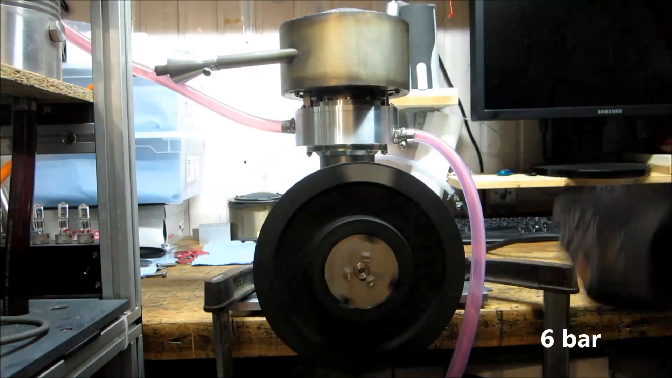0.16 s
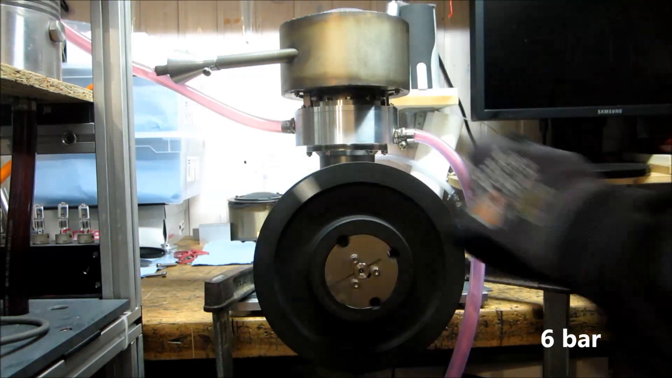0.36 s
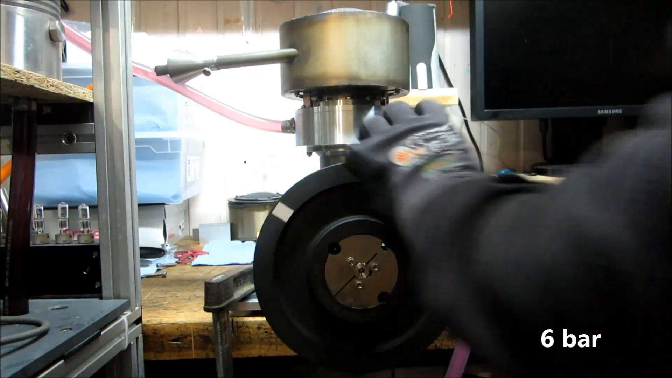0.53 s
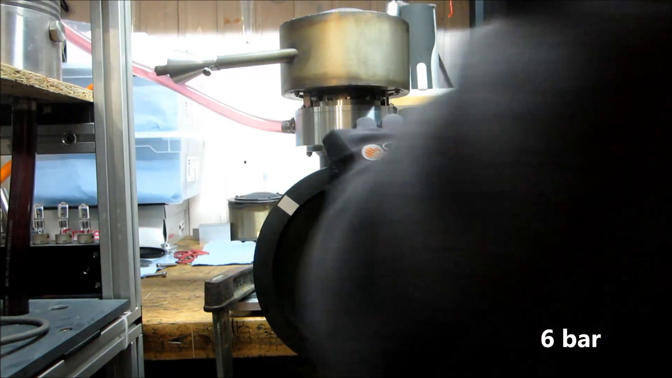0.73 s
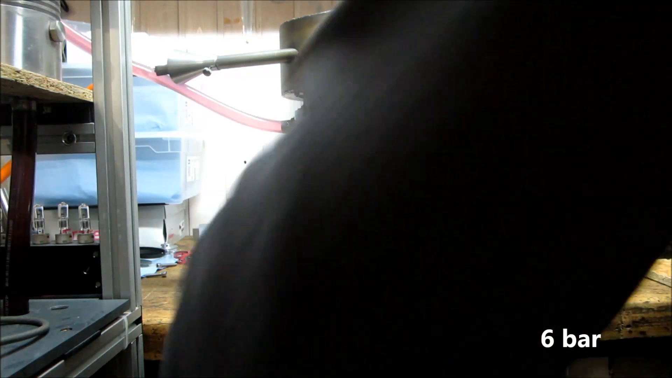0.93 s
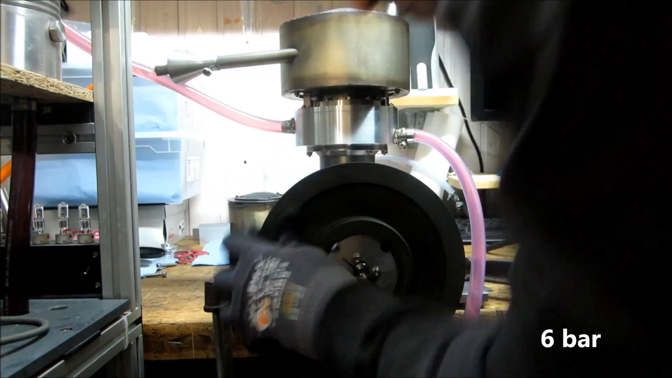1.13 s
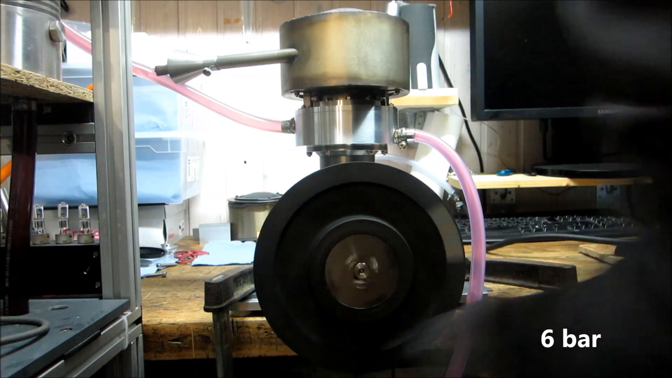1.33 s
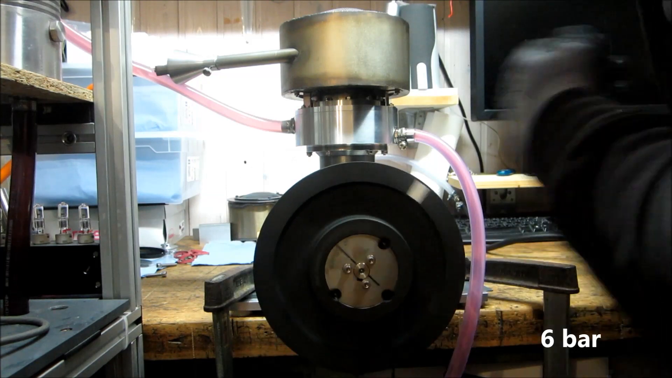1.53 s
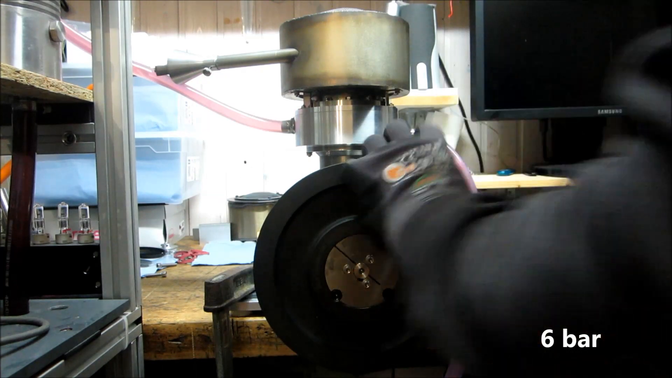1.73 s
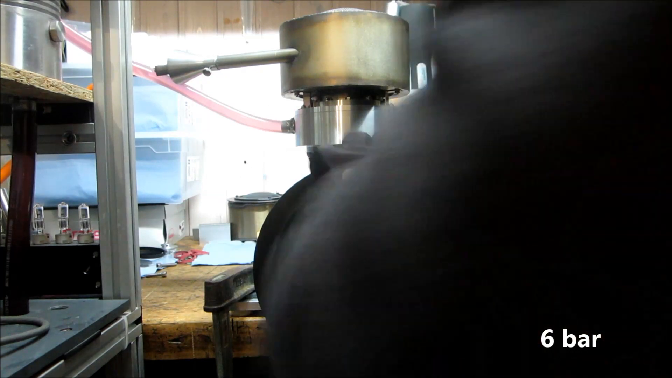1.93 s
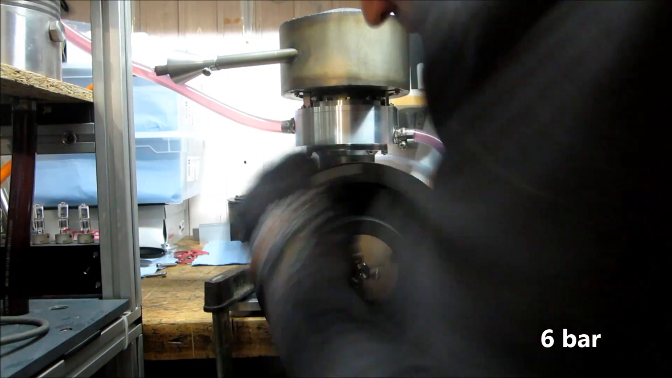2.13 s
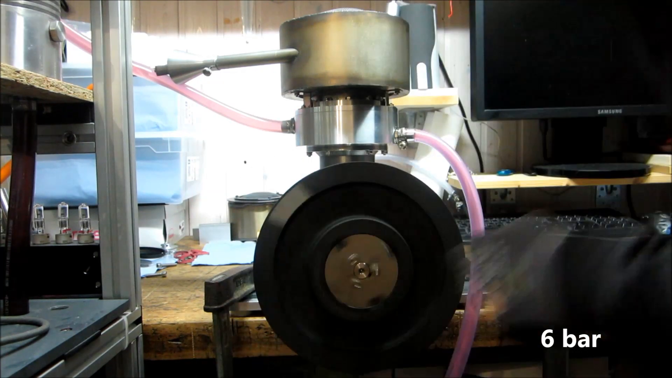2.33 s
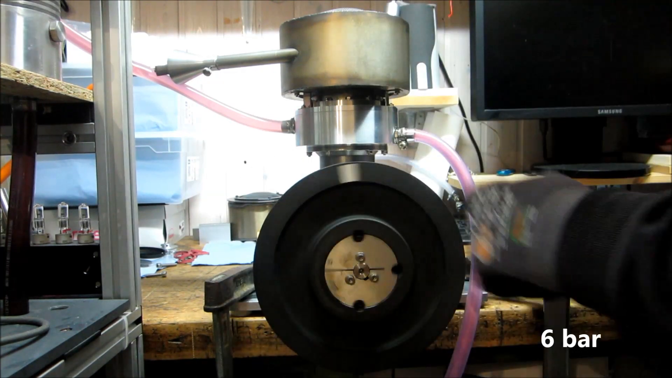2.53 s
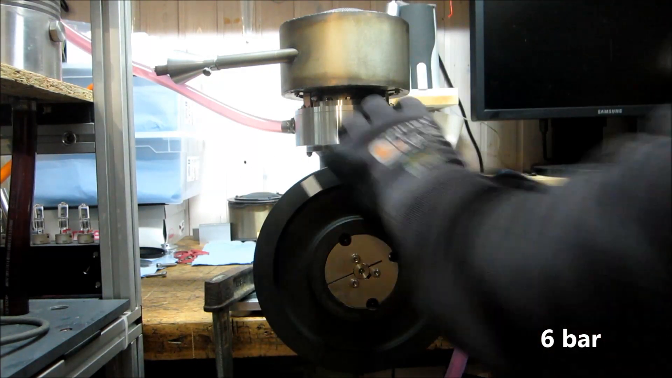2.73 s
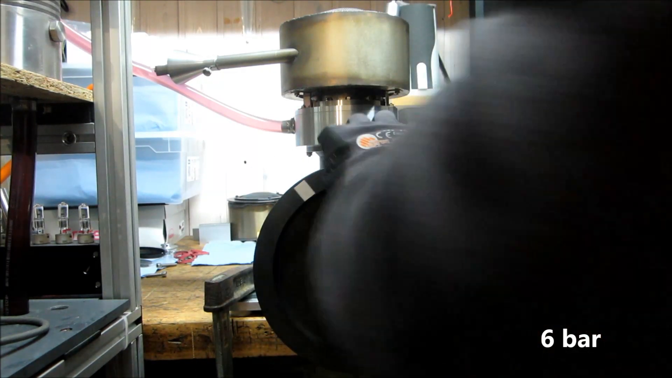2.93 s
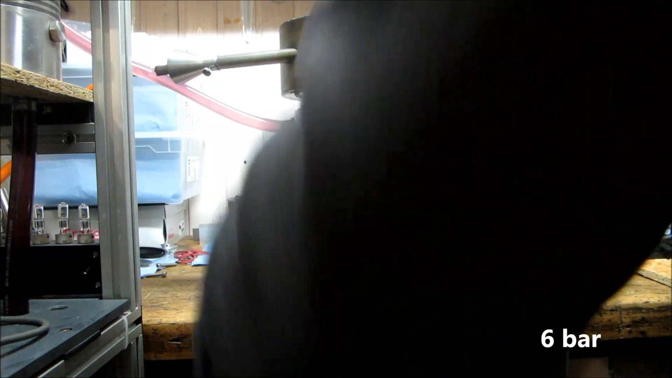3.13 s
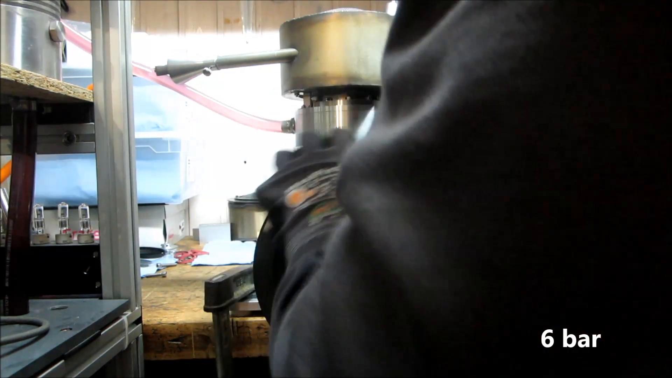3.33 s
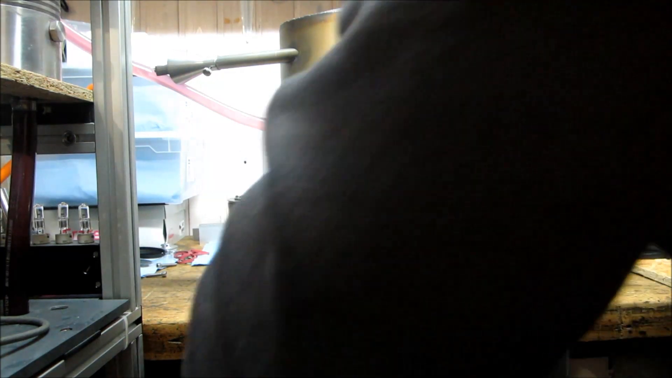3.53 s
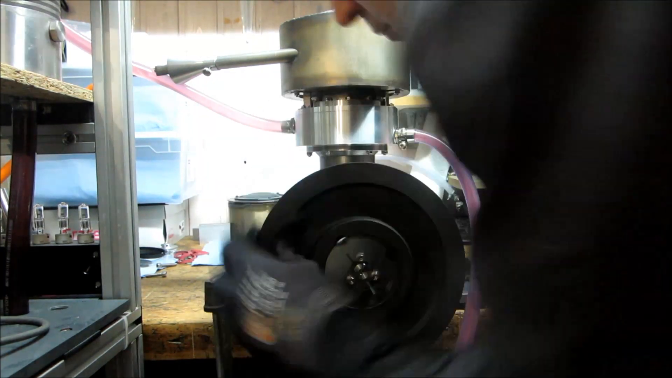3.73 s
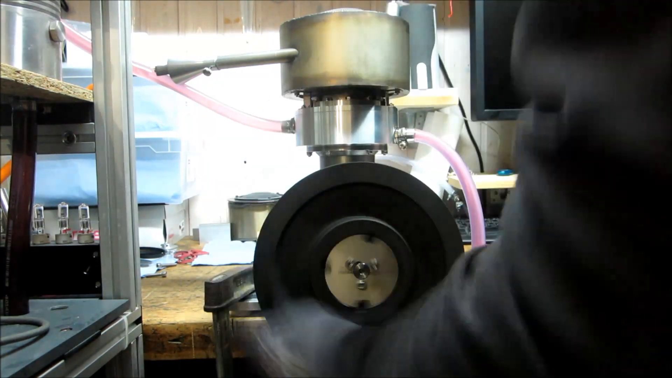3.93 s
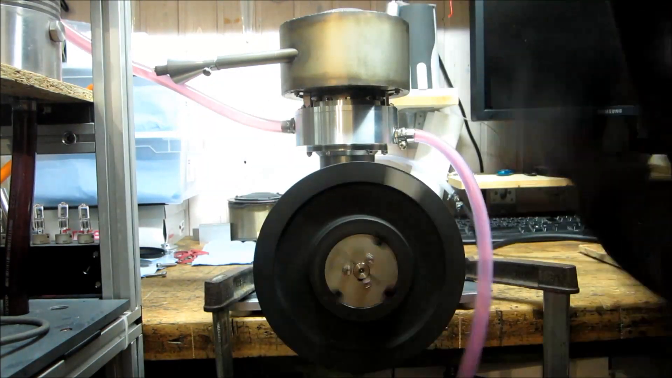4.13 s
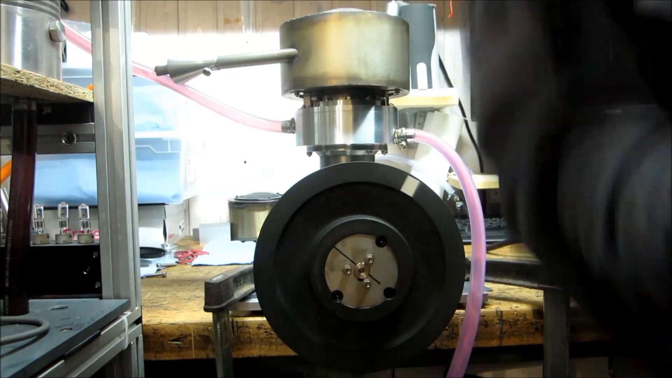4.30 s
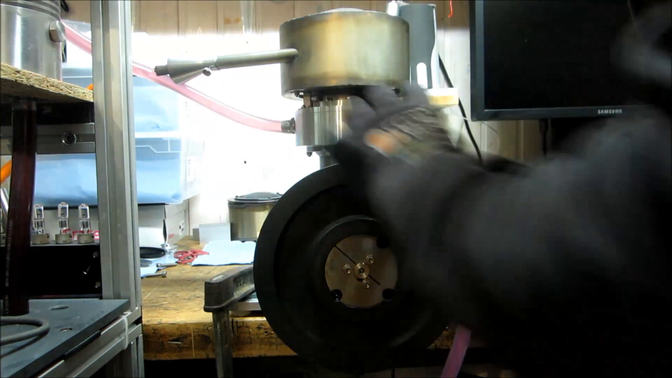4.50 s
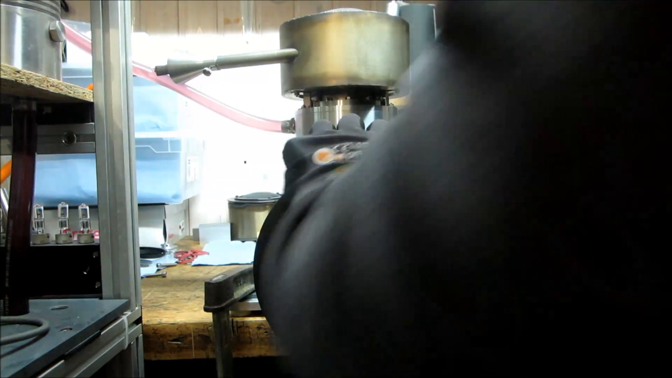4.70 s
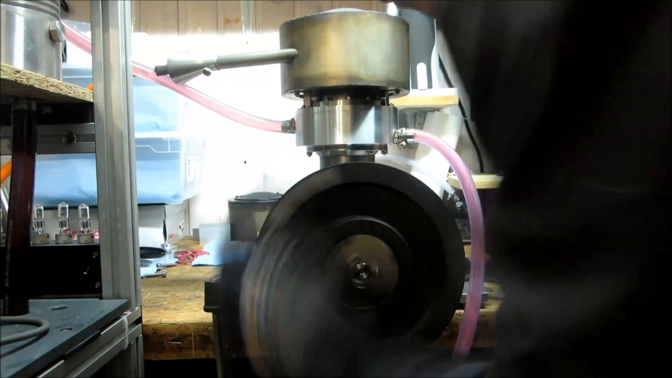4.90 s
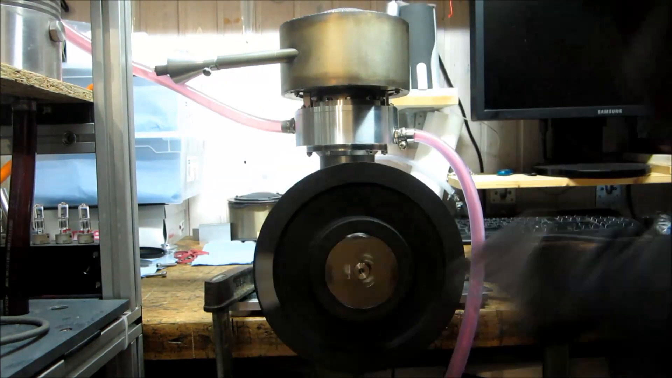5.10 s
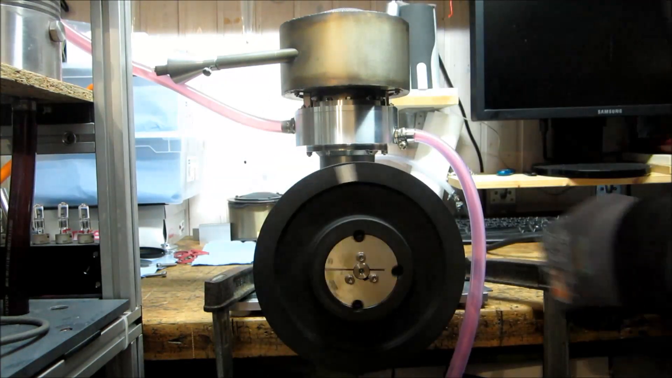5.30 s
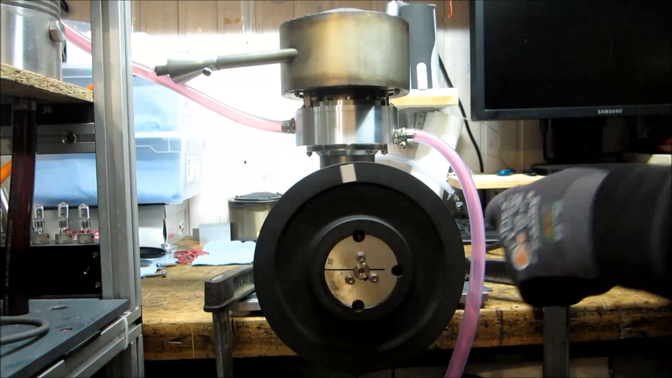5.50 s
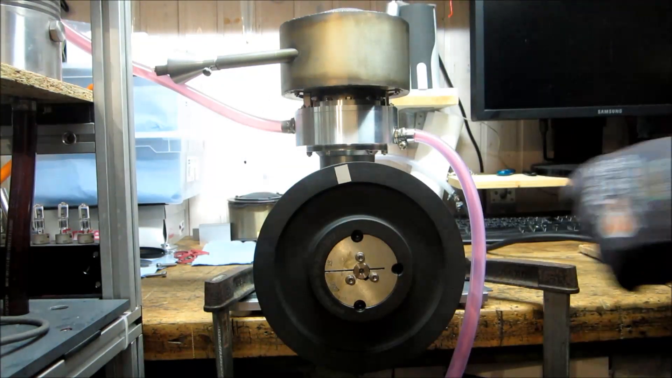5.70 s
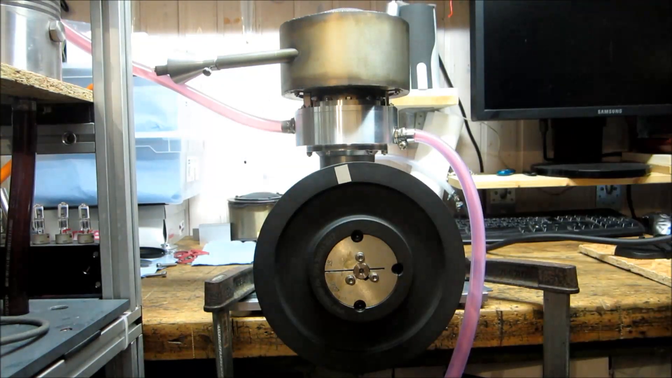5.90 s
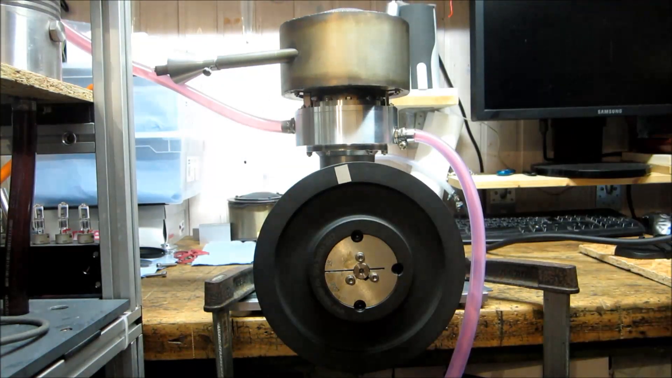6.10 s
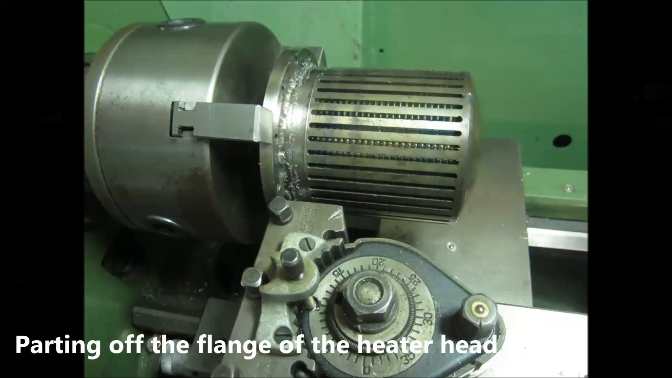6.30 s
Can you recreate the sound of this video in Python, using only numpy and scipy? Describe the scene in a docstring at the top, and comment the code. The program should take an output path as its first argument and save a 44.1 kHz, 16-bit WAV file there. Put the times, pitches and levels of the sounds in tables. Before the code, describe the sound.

Loose crank parts knock and rattle as a flywheel is swung by hand on a bench: doubled clacks, bouncing knocks, small bright clicks, brief dry scrapes. A dull boom from the bench sits under every heavy blow, and fabric swishes between them. The engine does not fire. The blows end shortly after five seconds, leaving soft hiss and low hum that cut off suddenly. Near, mono sound in a small hard room.

```python
"""Hand-swung flywheel on a bench

A gloved hand swings the flywheel of a small engine clamped to a workshop bench; it does not start.
Loose drive parts collide: bursts of impacts excite crankcase resonances and steel modes, and the bench booms.
Filtered noise gives the rub of glove and sleeve, random slips the scraping, gliding sines faint whistles.
Short, diffuse echoes of a small shop surround the blows, over low rumble, hiss and steady tones."""
import sys
import numpy as np
from scipy import signal
from scipy.fft import rfft, irfft, next_fast_len
from scipy.io import wavfile
from scipy.ndimage import uniform_filter1d

SR = 44100
rng = np.random.default_rng(int(sys.argv[2]) if len(sys.argv) > 2 else 0)


def bounce(signal):
    """Save signal as a 16-bit WAV file at the path given by the first command-line argument."""
    frames = np.transpose(np.atleast_2d(signal))
    limited = np.clip(frames, -1, 1)
    pcm = np.round(limited * 32767).astype(np.int16)
    wavfile.write(sys.argv[1], SR, pcm)


N = 280015

# Table levels are relative: each source may add its own gain.
# Kinds of blow: contact time [t/s], bench thump, bench boom, clack, tick, tick brightness,
# hollow case ring [level/dB each], case note, bench note [f/Hz each], bench sway [level/dB],
# delay until the bench takes the load [t/s]
BLOW_KINDS = {"forward": (.003, -1.5, -5, -2, -6.5, -2, -4, 1850, 545, -22, .0027),
              "over the top": (.0026, -8, -8.5, -1, -12, -5, -6, 1450, 555, -24, .0024),
              "touch down": (.006, -8, -5, -.5, -7.5, 0, -7, 1220, 345, -18, .003),
              "landing": (.0032, -5, -1, 1, -6, -7, -4, 1480, 320, -18, .005),
              "back": (.0027, -1.5, -10, .5, -7.5, 0, -2, 1215, 520, -27, .0026),
              "rebound": (.0028, 1, -3.5, -4, -2, -12, -7, 1850, 500, -14, .011),
              "hollow rebound": (.0025, 0, -5, 0, -1.5, -16, -3, 1195, 535, -15, .011),
              "clack": (.002, -9, -9.5, 1.5, -9, -7, -8, 1220, 480, -20, .0029),
              "rattle": (.004, -3, 0, -1, -9.5, 1, -4, 1200, 450, -14, .0035),
              "thud": (.005, -6, 0, -10, -22, -8, -4, 860, 400, -12, .002),
              "tap": (.003, -9, -5, -1, -20, -4, -3, 1200, 450, -20, .003),
              "tick": (.003, -14, -10, -6, 0, 0, -12, 1500, 380, -25, .0025)}
# Forward pulls: knock [t/s], knock, clack [level/dB each], delay to landing [t/s], landing in steel,
# landing in bench, bench sway [level/dB each], notes of knock, clack and landing [f/Hz each]
FORWARD_PULLS = [(.018, -40, -31.5, .118, -41, -38.5, -62, 1850, 1440, 1450),
                 (2.209, -36.5, -29, .121, -41, -41.5, -59, 1840, 1850, 1840),
                 (4.986, -36, -30, .146, -42, -39.5, -50, 1915, 2200, 1450)]
# Pulls the other way: knock [t/s], [level/dB]
BACK_PULLS = [(1.398, -35), (4.103, -34)]
# The wheel rocks back after a forward pull: [t/s], steel, bench, bench sway [level/dB each]
REBOUNDS = [(.296, -45.5, -43, -60), (2.546, -47, -46, -56)]
# The slack drive falls against its other side: [t/s], steel, bench, bench sway [level/dB each],
# added hollow ring of the case [level/dB], case note [f/Hz]
CLACKS = [(.195, -46, -50, -60, 5, 1840), (.207, -36.5, -39, -48, 3, 1160),
          (1.084, -35.5, -39, -63, 5, 1240), (2.433, -47, -45, -62, 7, 950),
          (2.447, -43, -41.5, -56, 4, 940), (3.757, -35.5, -39.5, -64, 6, 1210)]
# The linkage rattles under handling: [t/s], steel, bench [level/dB each], case note [f/Hz]
RATTLES = [(.002, -48, -49, 1850), (.107, -46, -48, 1100), (1.15, -52, -57, 850), (1.208, -57, -62, 1400),
           (1.26, -55, -60, 1065), (1.321, -56, -58, 2045), (2.096, -55, -54, 1625),
           (2.118, -57, -58, 1030), (2.164, -57, -62, 1920), (2.19, -49, -52, 1910),
           (3.393, -65, -63, 1500), (3.664, -63, -55, 1475), (3.696, -50, -55, 1030),
           (3.887, -56, -60, 1940), (4.938, -55, -63, 1500), (4.967, -48, -54, 1500)]
# Light hollow taps on the case: [t/s], steel, bench [level/dB each], case note [f/Hz]
TAPS = [(1.098, -41, -46, 1420), (2.619, -58, -54, 880), (3.94, -59, -56, 820), (4.76, -64, -67, 1750),
        (4.885, -63.5, -66, 900), (4.927, -55, -64, 1000), (5.346, -53.5, -61, 1210),
        (5.43, -62, -63, 1100)]
# Dull thuds as the engine settles on the bench: [t/s], [level/dB], bench note [f/Hz]
THUDS = [(.178, -48.5, 380), (2.403, -47, 425), (2.497, -53, 380), (3.412, -58, 550), (5.192, -48, 385)]
# Small sharp contacts: [t/s], [level/dB], contact time [t/s], brightness [level/dB]
TICKS = [(.079, -48.5, .002, 11), (.142, -47, .002, 9), (.195, -42.5, .002, -17), (.435, -54, .003, -30),
         (.869, -60, .0008, 10), (1.025, -59, .0023, -5), (1.153, -60, .0015, 5), (1.209, -61, .0015, 4),
         (1.262, -60, .0015, 4), (1.328, -48, .002, 0), (1.346, -49, .001, 6), (1.585, -52, .002, -12),
         (2.287, -50, .0016, 7), (2.297, -47, .0014, 8), (2.433, -44.5, .001, -16), (2.988, -62, .0015, 2),
         (3.027, -65, .004, -9), (3.174, -61, .002, -25), (3.646, -60, .0047, -9), (3.7, -57, .002, 8),
         (3.812, -58, .002, 8), (3.843, -55, .002, 10), (3.912, -59, .002, 8), (4.1345, -32, .00025, 4),
         (4.831, -64, .0034, -12), (5.077, -48, .0044, 8)]
# Resonances of the crankcase: [f/Hz], width [f/Hz], over the clack's spectrum [level/dB]
CASE_RESONANCES = [(728, 70, 0), (835, 60, 2), (1004, 60, 3), (1205, 70, 6), (1368, 45, 4), (1490, 45, 6),
                   (1698, 50, 5), (1825, 50, 8), (1897, 45, 6), (2056, 50, 1), (2378, 80, 7), (2718, 60, 4)]
# Modes of the flywheel's steel: [f/Hz], [level/dB], 60 dB decay time [t/s]
STEEL_MODES = [(3451, -1, .55), (3810, 3, .15), (4080, -4, .3), (4533, 2.5, .6), (4790, -5, .4),
               (5230, 1, .25), (5620, -6, .4), (6072, -2, .55), (6686, -5, .5), (6918, -3, .55),
               (7450, -7, .45), (7900, -6, .6), (8780, -1, .3), (9400, -7, .45), (10045, -7, .5),
               (10700, -9, .45), (11499, -8, .55), (12060, -9, .45), (13480, -13, .5), (15030, -19, .45)]
# Modes of the bench top: [f/Hz], [level/dB], 60 dB decay time [t/s]
BENCH_MODES = [(69.5, -32, 1.9), (75, -24, .8), (86, -21, .5), (103, -17.5, .55), (118, -16.5, 0.5),
               (147, -12, 0.13), (177, 3.5, 0.13), (194, 3, 0.13), (199.5, -23.5, 1.4), (243, -16, 0.33),
               (262, -8.5, 0.19), (285, -7.5, 0.2), (323, -12.5, 0.25), (346, -6, 0.19), (378, -14.5, .8),
               (422, -1, 0.23), (441.7, -24, 0.9), (460, -2.5, 0.11), (519, .5, 0.13), (551.8, .5, 0.11),
               (603.6, -7.5, 0.07), (690, -10, 0.12), (735, -9, .12)]
# Spectrum of the clack: [f/Hz], density [level/dB]
CLACK_SPECTRUM = [(250, -22), (550, -5), (800, -3), (1200, .5), (1600, -1.5), (2000, -2), (2500, -3.5),
                  (3100, -7), (5000, -22), (16000, -45)]
# Spectrum of the tick: [f/Hz], density [level/dB]
TICK_SPECTRUM = [(1200, -27), (2600, -6.5), (3200, 0.5), (3850, 5), (4600, -1), (6000, -5), (8800, -7),
                 (12000, -12.5), (15500, -28.5)]
# Dry parts scrape as the wheel creeps round: peak [t/s], [level/dB], rise, fall [t/s each]
SCRAPES = [(1.2, -61, .07, .09), (1.392, -49, .02, .008), (3.825, -56, .03, .03), (3.91, -61, .02, .04),
           (4.035, -64, .015, .03), (4.098, -48, .022, .008)]
# Spectrum of the scraping: [f/Hz], density [level/dB]
SCRAPE_SPECTRUM = [(200, -14), (600, -2), (1000, 0), (2000, -4), (3000, -10), (5000, -18), (14000, -32)]
# Glove rub at a forward pull: delay from knock to peak [t/s], [level/dB], rise, fall [t/s each],
# share of fine fizz [0-1]
FORWARD_RUB = (.05, -50, .036, .084, .24)
# Glove rub at a pull the other way: the same columns
BACK_RUB = (-.004, -50.6, .027, .095, .25)
# Sleeve brushes: centre [t/s], [level/dB], half length [t/s], share of fine fizz [0-1],
# low edge, high edge [f/Hz each]
SWISHES = [(.07, -54, .03, .4, 100, 15500), (.34, -64, .08, .6, 100, 15500),
           (.68, -70, .11, .38, 400, 14000), (1.12, -64.5, .12, .28, 100, 15000),
           (1.338, -53, .014, .24, 200, 15000), (2.6, -71, .09, .7, 100, 15500),
           (3.81, -63, .12, .45, 200, 15000), (4.04, -66, .03, .2, 600, 15000),
           (4.73, -74.5, .11, .25, 200, 15000), (5.665, -62.5, .06, .85, 1500, 9000),
           (5.89, -73, .025, .76, 1200, 9000), (6.068, -66, .028, .99, 5500, 15000)]
# Spectrum of the coarse rub: [f/Hz], density [level/dB]
CLOTH_SPECTRUM = [(200, -1), (600, -0.5), (1300, 0), (3000, -1), (5000, -8), (9000, -46.5), (15000, -27.5)]
# Spectrum of the fine fizz: [f/Hz], density [level/dB]
FIZZ_SPECTRUM = [(1500, -14), (4000, -4), (6500, -3), (9000, -4), (12000, -7.5), (15500, -16)]
# Thin gliding whistles: start [t/s], length [t/s], start, middle, end [f/Hz each], [level/dB]
WHISTLES = [(1.6, .2, 14900, 14100, 13400, -91), (1.6, .08, 12100, 11400, 10900, -91),
            (1.68, .05, 11000, 11900, 12300, -91), (3.19, .11, 11000, 11900, 12000, -89),
            (3.29, .09, 12100, 11800, 12000, -89), (3.24, .15, 15150, 14900, 14800, -94),
            (3.37, .13, 11000, 11950, 11600, -91), (3.4, .13, 10300, 10600, 9700, -93),
            (3.49, .09, 12000, 11600, 10900, -90), (4.55, .11, 14300, 15300, 14500, -93),
            (4.6, .08, 11000, 11700, 12000, -91), (4.74, .12, 12000, 11150, 12200, -89),
            (4.78, .08, 13000, 13600, 13900, -91), (5.22, .15, 14650, 14400, 13700, -93),
            (5.3, .07, 15200, 15000, 14200, -93)]
# Reverberation of the shop: [f/Hz], 60 dB decay time [t/s]
ROOM_DECAY = [(80, 0.71), (200, 0.49), (420, 0.72), (800, 0.43), (2000, 0.22), (5000, 0.13), (10000, 0.1),
              (16000, 0.66)]
# Spectrum of the rumble and hiss: [f/Hz], density [level/dB]
AIR_SPECTRUM = [(15, -42.5), (25, -2.5), (80, -0.5), (144, -5), (204, -2), (254, -4.5), (554, -11.5),
                (687, -10.5), (807, -8.5), (899, -12.5), (1150, -14), (2370, -18), (2640, -17.5),
                (11600, -26), (15600, -31.5)]
# Faint steady tones: [f/Hz], rms [level/dB]
HUM_TONES = [(70, -80.5), (420, -87), (7854, -93.5)]

OVER_TOP_S, DOUBLE_KNOCK_S = .0338, .023
FIRST_BOUNCE_S, BOUNCE_STRETCH = .0795, 1.35  # the second rebound takes longer than the first
# the first rebound against the knock, and the loss to the next
BOUNCE_STEEL_DB, BOUNCE_BENCH_DB, BOUNCE_LOSS_DB = -10, -7, 7.5
TICK_BENCH_LIMIT_DB = -52  # a tick is too light to shake the bench harder than this
STRAY_DB, STRAY_RANGE_DB, HANDLING_S = -67, 8, 5.3  # strays last as long as the hand works the wheel
STEEL_SPLIT = .003  # the wheel is not quite round, so each mode beats with close neighbours
RUB_DROP_DB, RUB_CUSP = 8.7, .7  # drop after one rise or fall time, and the power of time it follows
AIR_DB = -69.7
STOP_S, EDGE_HZ = 6.209, 15780


def drive():
    """Impact sequence: all the blows of the loose drive as the wheel is swung to and fro."""
    knocks = [knock for row in FORWARD_PULLS for knock in forward_pull(*row)]
    knocks += [knock for row in BACK_PULLS for knock in back_pull(*row)]
    for kind, rows in ("clack", CLACKS), ("rebound", REBOUNDS):
        knocks += [blow(kind, *row) for row in rows]
    for kind, rows in ("rattle", RATTLES), ("tap", TAPS):
        knocks += [blow(kind, s, steel_db, bench_db, case_hz=hz) for s, steel_db, bench_db, hz in rows]
    knocks += [blow("thud", s, db, db, bench_hz=hz) for s, db, hz in THUDS]
    for s, db, contact_s, bright_db in TICKS:
        bench_db = min(db, TICK_BENCH_LIMIT_DB)
        knocks.append(blow("tick", s, db, bench_db, bright_db=bright_db, contact_s=contact_s))
    return knocks + strays()


def forward_pull(s, knock_db, clack_db, flight_s, steel_db, bench_db, sway_db,
                 knock_hz, clack_hz, landing_hz):
    """Backlash: the drive takes up its slack, clacks over the top, flies free and lands twice."""
    touch_s = s + flight_s
    return [blow("forward", s, knock_db, knock_db, case_hz=knock_hz),
            blow("over the top", s + OVER_TOP_S, clack_db, knock_db, case_hz=clack_hz),
            blow("touch down", touch_s, steel_db, bench_db, sway_db),
            blow("landing", touch_s + DOUBLE_KNOCK_S, steel_db, bench_db, case_hz=landing_hz)]


def back_pull(s, db, count=2):
    """Energy loss on impact: one heavy knock, then two rebounds, the second weaker and more delayed."""
    knocks = [blow("back", s, db, db)]
    for k in range(count):
        s += FIRST_BOUNCE_S * BOUNCE_STRETCH ** k
        left_db = db - k * BOUNCE_LOSS_DB
        knocks.append(blow("hollow rebound", s, left_db + BOUNCE_STEEL_DB, left_db + BOUNCE_BENCH_DB))
    return knocks


def strays(count=18, low_hz=750, high_hz=2100):
    """Random excitation: faint rattles at chance moments, on chance notes."""
    knocks = []
    for k, (when, soft, note) in enumerate(rng.random((count, 3))):
        s = HANDLING_S * (k + when) / count
        case_hz = low_hz * (high_hz / low_hz) ** note
        steel_db, bench_db = STRAY_DB - STRAY_RANGE_DB * soft, STRAY_DB - STRAY_RANGE_DB
        knocks.append(blow("rattle", s, steel_db, bench_db, case_hz=case_hz))
    return knocks


def blow(kind, s, steel_db, bench_db, sway_db=None, hollow_db=0, case_hz=None, bench_hz=None,
         bright_db=0, contact_s=None):
    """Impact: its kind sets the balance of modes; steel and bench are driven at separate levels."""
    (usual_s, thump, boom, clack, tick, bright, hollow,
     usual_case_hz, usual_bench_hz, sway, lag_s) = BLOW_KINDS[kind]
    return dict(s=s, contact_s=contact_s or usual_s, lag_s=lag_s,
                thump_db=thump + bench_db, boom_db=boom + bench_db, sway_db=sway_db or sway + bench_db,
                clack_db=clack + steel_db, tick_db=tick + steel_db,
                bright_db=bright + bright_db, hollow_db=hollow + hollow_db,
                case_hz=case_hz or usual_case_hz, bench_hz=bench_hz or usual_bench_hz)


def crank(knocks, steel_db=-12.5, clack_db=-1, note_db=0., rattle_db=-8, tick_db=1.5, tick_time=0.83,
          split_hz=5500, firm_s=0.0039, freedom=0.51):
    """Forced resonance: each knock clacks through the crankcase, ticks, and rings the flywheel's steel."""
    t, ring_t = np.arange(SR // 16) / SR, np.arange(SR) / SR
    clacks, ticks, rings = np.zeros((3, N))
    lowpass = signal.butter(2, split_hz, fs=SR)
    for knock in knocks:
        s, contact_s, lag_s = knock["s"], knock["contact_s"], knock["lag_s"]
        contact = chatter(t, contact_s)
        force = amp(knock["clack_db"]) * np.linalg.norm(contact)
        excitation = unit(contact) + amp(rattle_db) * after_rattle(t)
        add(clacks, s, force * unit(signal.fftconvolve(excitation, crankcase())))
        note = case_note(t, knock["case_hz"], contact_s)
        add(clacks, s, force * amp(knock["hollow_db"] + note_db) * note)

        burst = amp(knock["tick_db"]) * chatter(t, contact_s * tick_time)
        dull = signal.filtfilt(*lowpass, burst)
        # a harder contact keeps more of the top treble; the divisor limits the change in level
        bright = dull + amp(knock["bright_db"]) * (burst - dull)
        add(ticks, s, bright / np.sqrt(.7 + .3 * amp(2 * knock["bright_db"])))
        # on a slack rebound the wheel hangs free and rings more
        add(rings, s + lag_s, burst * (abs(lag_s) / firm_s) ** freedom)
    steel = unit(sum(ring(STEEL_MODES, ring_t * (1 + k * STEEL_SPLIT)).sum(0) for k in (-1, 0, 1)))
    return (amp(clack_db) * clacks + amp(tick_db) * through(ticks, colour(TICK_SPECTRUM))
            + amp(steel_db) * through(rings, steel))


def chatter(t, contact_s, grain=0.6, rise=0.18, hold=3.91):
    """Rough contact: loose steel faces meet in a burst of tiny uneven impacts."""
    a, b = rng.standard_normal((2, len(t)))
    shape = (1 - np.exp(-t / (rise * contact_s))) * np.exp(-(t / (hold * contact_s)) ** 2)
    return unit(a * np.exp(grain * b) * shape) * np.sqrt(np.sum(shape ** 2))


def after_rattle(t, per_s=260, fade_s=.018, size_db=4):
    """Decaying random impacts: loose parts jiggle on after a blow in a few separate, fading clicks."""
    sizes = amp(size_db * rng.uniform(-1, 1, len(t)))
    clicks = (rng.random(len(t)) < per_s / SR) * rng.choice([-1, 1], len(t)) * sizes
    return clicks * np.exp(-t / fade_s) / np.sqrt(per_s * fade_s / 2)


def crankcase(scatter_db=2.5, shift=.007):
    """Resonance shift: the crank stands at another angle for each blow, which detunes the case a little."""
    luck = rng.uniform(-1, 1, (len(CASE_RESONANCES), 2))
    peaks = [(hz * (1 + shift * a), width, db + scatter_db * b)
             for (hz, width, db), (a, b) in zip(CASE_RESONANCES, luck)]
    return colour(CLACK_SPECTRUM, peaks, size=4096)


def case_note(t, hz, contact_s, t60=.055, rise=.7, waver=.012):
    """Dominant mode: it builds up during the contact, wavers in frequency and decays quickly."""
    wavering = hz * (1 + waver * evened(uniform_filter1d(rng.standard_normal(len(t)), size=200)))
    shape = (1 - np.exp(-t / (rise * contact_s))) * np.exp(-np.log(1000) * t / t60)
    return unit(shape * np.sin(2 * np.pi * (np.cumsum(wavering) / SR + rng.random())))


def ring(modes, t, scatter_db=0., spread=0.31):
    """Modal decay: one dying sine a mode, with random starting phases and optional scatter in level."""
    hz, db, t60 = np.transpose(modes)[:, :, None]
    phase, luck = rng.uniform(-1.01, 1, (2, len(modes), 1))
    decay = amp(db + scatter_db * luck) * np.exp(-np.log(1000) * t / t60)
    return decay * np.sin(2 * np.pi * (hz * t + spread * phase))


def bench(knocks, thump_db=-.5, boom_db=-1, sway_db=-1.5, rise_s=0.007, sway_rise_s=.016,
          scatter_db=1.5, give=0.007, note_db=6, note_width=.17):
    """Inertia: the clamped top takes a moment to swing, most near one note, and the frame sways below."""
    step = 16  # the bench is low in pitch, so it is computed at a lower sample rate
    t, out = np.arange(0, SR, step) / SR, np.zeros(N)
    hz = np.transpose(BENCH_MODES)[0]
    swaying, booming = hz < 110, hz > 245
    thumping = ~swaying & ~booming
    rise = 1 - np.exp(-(t / np.where(swaying, sway_rise_s, rise_s)[:, None]) ** 2)
    onset = t < .05  # each group is levelled over this span
    for knock in knocks:
        stress = amp(note_db * np.exp(-(np.log(hz / knock["bench_hz"]) / note_width) ** 2))
        # the load on the clamps shifts the pitch a little from blow to blow
        loaded_t = t * (1 + give * rng.uniform(-1, 1))
        modes = ring(BENCH_MODES, loaded_t, scatter_db) * rise * stress[:, None]
        swing = 0
        for group, db in ((swaying, knock["sway_db"] + sway_db), (thumping, knock["thump_db"] + thump_db),
                          (booming, knock["boom_db"] + boom_db)):
            motion = modes[group].sum(0)
            swing = swing + amp(db) * motion / np.std(motion[onset])
        add(out, knock["s"] + knock["lag_s"], signal.resample_poly(swing, step, 1) / np.sqrt(2))
    return out


def scraping(slips_per_s=200, size_db=4.5):
    """Stick-slip friction: dry parts slide in tiny uneven slips that sound through the case."""
    t = np.arange(N) / SR
    sizes = amp(size_db * rng.standard_normal(N))
    slips = (rng.random(N) < slips_per_s / SR) * rng.choice([-1, 1], N) * sizes
    level = sum(amp(db) * np.exp(-np.maximum((s - t) / rise_s, (t - s) / fall_s) ** 2)
                for s, db, rise_s, fall_s in SCRAPES)
    return level * evened(through(slips, colour(SCRAPE_SPECTRUM, CASE_RESONANCES)))


def glove(level_db=1.5):
    """Friction noise under load: the glove grips the rim harder up to each pull and slides off."""
    t, out, rub = np.arange(N) / SR, np.zeros(N), cloth(flutter_db=2)
    for pulls, profile in (FORWARD_PULLS, FORWARD_RUB), (BACK_PULLS, BACK_RUB):
        delay_s, db, rise_s, fall_s, fine = profile
        peaks = [s + delay_s for s, *_ in pulls]
        # distance to the nearest peak, in rise or fall times
        away = np.min([np.maximum((s - t) / rise_s, (t - s) / fall_s) for s in peaks], axis=0)
        out += amp(db + level_db - RUB_DROP_DB * abs(away) ** RUB_CUSP) * blend(*rub, fine)
    return out


def sleeve(level_db=1.5, flatness=2.5):
    """Band-limited friction noise: each brush of the sleeve swells and fades in its own band."""
    out, (coarse, fizz) = np.zeros(N), cloth(flutter_db=1.2)
    for s, db, half_s, fine, low_hz, high_hz in SWISHES:
        start, stop = max(round((s - 3 * half_s) * SR), 0), min(round((s + 3 * half_s) * SR), N)
        at = np.arange(start, stop)
        band = signal.butter(2, [low_hz, high_hz], "bandpass", fs=SR)
        swell = np.exp(-abs((at / SR - s) / half_s) ** flatness)
        brush = signal.lfilter(*band, blend(coarse[at], fizz[at], fine))
        out[at] += amp(db + level_db) * swell * brush
    return out


def cloth(flutter_db, grain=0.31):
    """Sliding friction: coarse rub and fine fizz of cloth, both catching unevenly."""
    catch = amp(flutter_db * evened(uniform_filter1d(rng.standard_normal(N), size=300)))
    fibres = evened(rng.standard_normal(N) * np.exp(grain * rng.standard_normal(N)))
    return catch * noise(CLOTH_SPECTRUM), catch * through(fibres, colour(FIZZ_SPECTRUM))


def blend(coarse, fizz, fine):
    """Power-preserving mixture of rub and fizz by the share of fizz."""
    share = np.clip(fine, 0, 1)
    return np.sqrt(1 - share) * coarse + np.sqrt(share) * fizz


def whistles(flicker_db=3, level_db=5, waver=.006):
    """Frequency modulation: very faint, thin whistles that glide and flicker high in the treble."""
    out = np.zeros(N)
    for s, length_s, start_hz, middle_hz, end_hz, db in WHISTLES:
        u = np.linspace(0, 1, round(length_s * SR))
        glide_hz = np.polyval(np.polyfit([0, .5, 1], [start_hz, middle_hz, end_hz], 2), u)
        flicker = evened(uniform_filter1d(rng.standard_normal(len(u)), size=900))
        wander = evened(uniform_filter1d(rng.standard_normal(len(u)), size=500))
        tone = np.sin(2 * np.pi * np.cumsum(glide_hz * (1 + waver * wander)) / SR)
        swell = np.sqrt(u * (1 - u)) * 2
        add(out, s, amp(db + level_db + flicker_db * flicker) * swell * tone)
    return out


def room(x, count=3, turns_per_s=1.7):
    """Diffuse reverberation: three random echo tails are blended in slowly turning proportions."""
    turn = turns_per_s * np.arange(N) / SR
    tails = (through(x * np.cos(np.pi * (2 * turn + k / count)), echoes()) for k in range(count))
    return sum(tails) * np.sqrt(2 / count)


def echoes(gap_s=0.0033, early_db=4, early_s=0.016):
    """Reverberation of a small cluttered shop: strong early echoes, then a tail that dies by band."""
    taps = rng.standard_normal(SR) * (rng.random(SR) < .1)
    hz, t, z = signal.stft(taps, SR, nperseg=256)
    decay = np.exp(-np.log(1000) * t / read(ROOM_DECAY, hz)[:, None])
    tail = signal.istft(z * decay, SR, nperseg=256)[1]
    t = np.arange(len(tail)) / SR
    return unit(tail * (t > gap_s) * amp(early_db * np.exp(-t / early_s)))


def shop_air():
    """Stationary background: soft rumble and hiss with a few faint steady tones."""
    t = np.arange(N) / SR
    tones = sum(amp(db) * np.sqrt(2) * np.sin(2 * np.pi * (hz * t + rng.random())) for hz, db in HUM_TONES)
    return amp(AIR_DB) * noise(AIR_SPECTRUM) + tones


def noise(points):
    """Spectral shaping: steady noise of unit rms with a given spectrum."""
    size = next_fast_len(N, True)
    gain = amp(read(points, np.fft.rfftfreq(size, 1 / SR)))
    return evened(irfft(rfft(rng.standard_normal(size)) * gain, size)[:N])


def colour(points, peaks=(), size=8192):
    """Minimum-phase response of unit energy: a smooth spectrum with resonances on top."""
    hz = abs(np.fft.fftfreq(size, 1 / SR))
    power = 1 + sum(amp(2 * db) / (1 + (2 * (hz - f) / width) ** 2) for f, width, db in peaks)
    log_gain = np.log(amp(read(points, hz)) * np.sqrt(power))
    # the Hilbert transform of the log gain supplies the causal phase
    return unit(np.fft.ifft(np.exp(np.conj(signal.hilbert(log_gain)))).real[:size // 2])


def through(x, response):
    """Linear filtering: convolves a sound with an impulse response."""
    return signal.fftconvolve(x, response)[:len(x)]


def add(mix, s, sound):
    """Superposition: mixes a sound in at a time in seconds."""
    part = mix[max(round(s * SR), 0):][:len(sound)]
    part += sound[:len(part)]


def read(points, hz):
    """Interpolation of a table on a log-frequency axis."""
    f, value = np.transpose(points)
    return np.interp(np.log(hz + 1), np.log(f + 1), value)


def amp(db):
    """Level to amplitude ratio: decibels to gain."""
    return 10 ** (np.asarray(db) / 20)


def evened(x):
    """Normalisation to an rms of one."""
    return x / np.sqrt(np.mean(x ** 2) + 1e-20)


def unit(x):
    """Normalisation to an energy of one."""
    return x / np.sqrt(np.sum(x ** 2) + 1e-20)


def scene(metal_room_db=-3, bench_room_db=-5, room_low_hz=75):
    """Superposition of all sources in two equal channels; the small room adds little deepest bass."""
    knocks = drive()
    metal, wood = crank(knocks) + scraping(), bench(knocks)
    highpass = signal.butter(2, room_low_hz, "highpass", fs=SR)
    thrown = signal.lfilter(*highpass, amp(metal_room_db) * metal + amp(bench_room_db) * wood)
    mono = metal + wood + room(thrown) + glove() + sleeve() + whistles() + shop_air()
    return np.array([mono, mono])


def record(dry):
    """Band limitation: the sound stops dead shortly before the end, then passes a low-pass filter."""
    live = np.arange(N) / SR < STOP_S
    lowpass = signal.firwin(511, EDGE_HZ, window=("kaiser", 9), fs=SR)
    return signal.oaconvolve(dry * live, lowpass[None], "same")


dry = scene()
out = record(dry)
bounce(out)
```